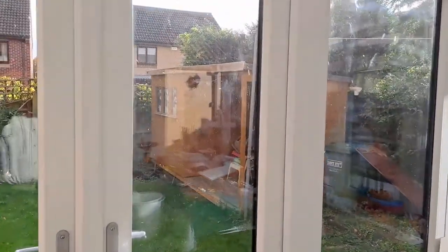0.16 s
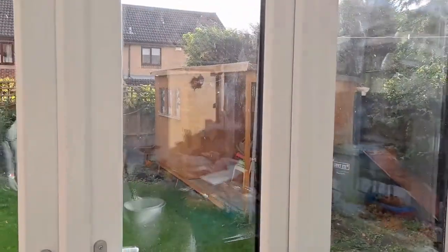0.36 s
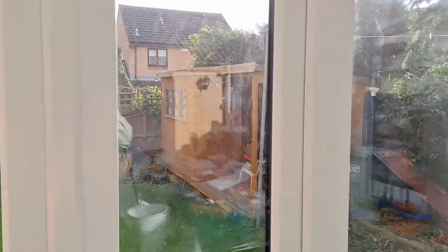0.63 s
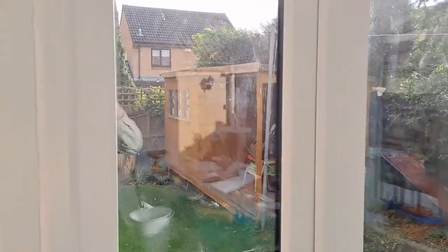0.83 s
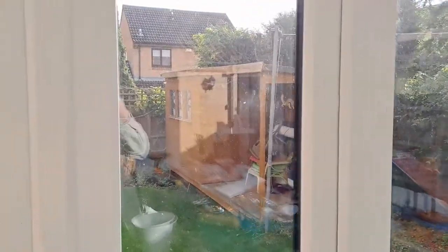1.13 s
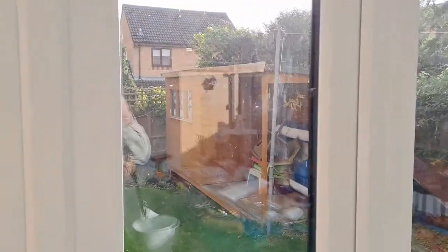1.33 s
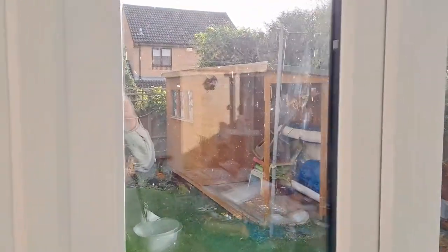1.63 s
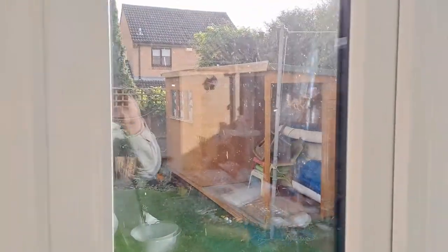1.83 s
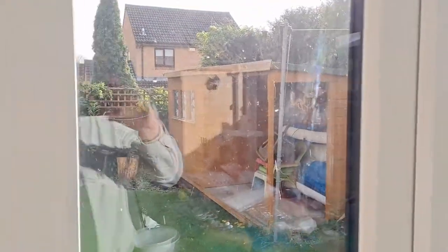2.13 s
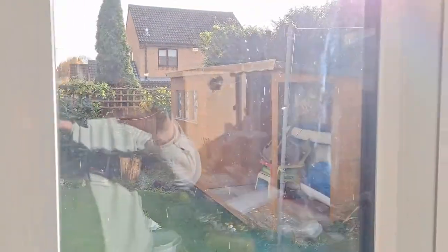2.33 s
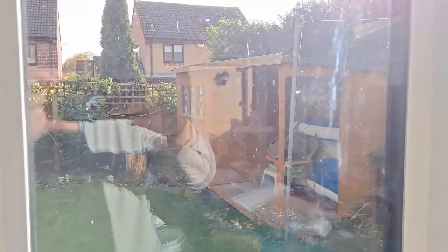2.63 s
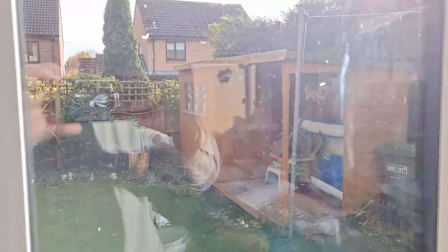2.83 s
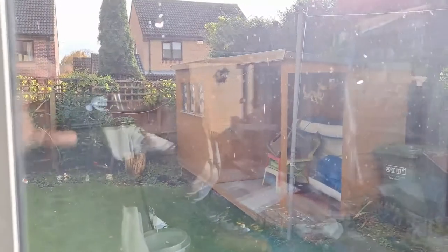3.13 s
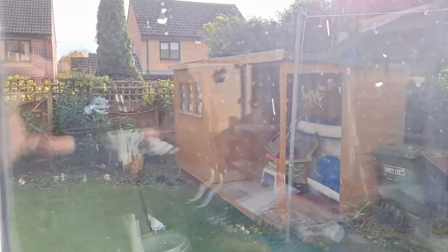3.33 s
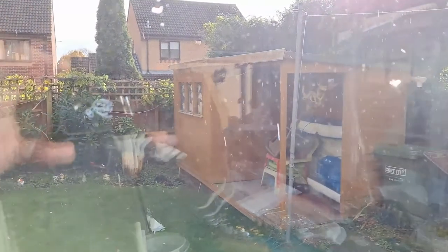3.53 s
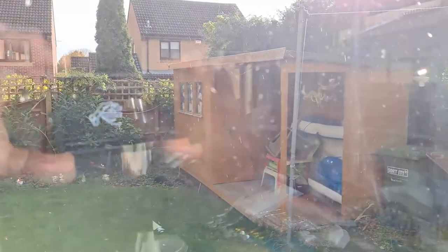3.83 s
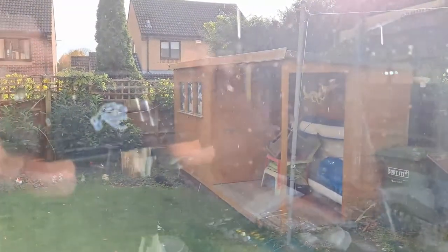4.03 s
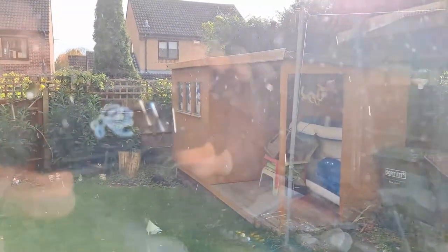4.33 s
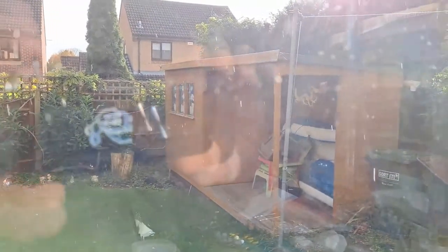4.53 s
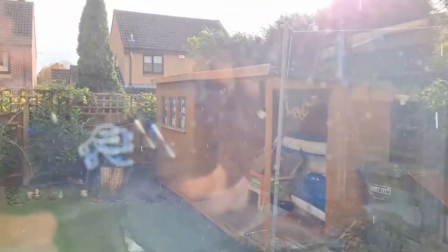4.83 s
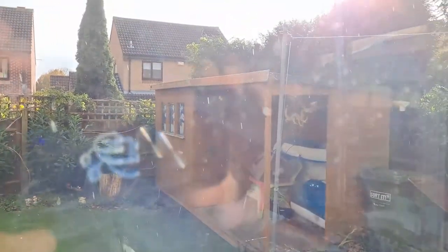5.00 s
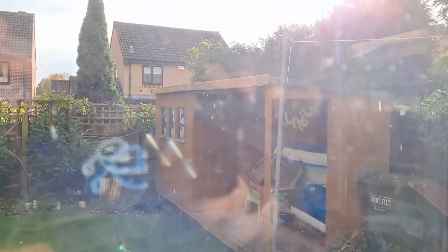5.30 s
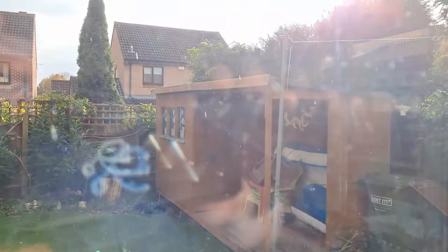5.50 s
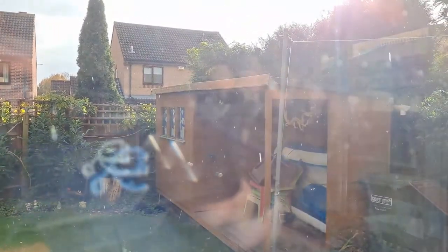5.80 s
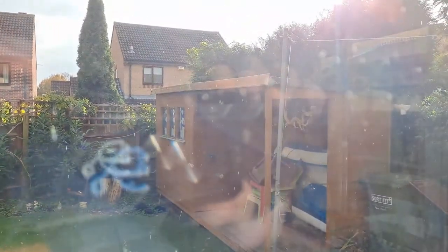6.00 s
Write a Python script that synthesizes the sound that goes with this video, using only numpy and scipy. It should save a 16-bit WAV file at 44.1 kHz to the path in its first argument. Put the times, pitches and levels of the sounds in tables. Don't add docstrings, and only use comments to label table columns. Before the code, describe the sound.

Steady rain patters on glass panes heard from inside a glazed room, with distinct plinking drops and one dull, rattling knock past the middle.

```python
import sys
import numpy as np
from scipy import signal
from scipy.fft import rfft, irfft
from scipy.io import wavfile
from scipy.ndimage import uniform_filter1d

SR = 44100
rng = np.random.default_rng(int(sys.argv[2]) if len(sys.argv) > 2 else 0)


def volts_from_db(level):
    exponent = np.asarray(level, float) / 20
    return 10 ** exponent


def persist_wave(psi):
    counts = np.round(np.clip(psi, -1, 1) * 32767).astype(np.int16)
    wavfile.write(sys.argv[1], SR, np.atleast_2d(counts).T)


N = 271656

# [t/s, level/dB]
RAIN_STRENGTH = [(0, -50), (.4, -50.5), (.85, -48), (1.15, -52), (1.4, -47.5), (1.9, -49), (2.4, -49),
                 (3.2, -50), (3.8, -50.5), (4.3, -49), (4.7, -51.5), (5.15, -50), (5.35, -49.5), (5.7, -51),
                 (6.16, -53)]
# [t/s, level over the slow strength/dB]
FLURRIES = [(.26, 1.5), (.34, 0), (.52, 4.5), (1.06, -2), (1.13, 4), (1.78, -1.5), (1.98, 2), (2.06, -0.5),
            (2.37, 1.5), (3.48, 5), (3.55, -0.5), (3.61, 3.5), (3.68, -1.5), (3.94, -3), (4.21, -4),
            (4.32, 0.5), (4.46, 3), (4.7, 1.5), (5.15, -2), (5.25, 1.5)]
# [f/Hz, level per Hz/dB]
PANE_SPECTRUM = [(150, -38), (250, -13), (330, -19), (695, -8), (886, -10), (1130, -8), (1210, -7.5),
                 (2300, 0.5), (2830, -0.5), (3310, 0), (4550, -18), (7740, -14), (10600, -27.5),
                 (14000, -25), (15800, -27)]
# [f/Hz, level per Hz/dB]
RUMBLE_SPECTRUM = [(25, 1), (42, 1.5), (60, 5), (78, -8.5), (100, 1.5), (124, -2.5), (146, -3.5), (250, -8),
                   (500, -10), (700, -50)]
# [f/Hz, correlation/1]
COHERENCE = [(60, 0.71), (180, 0.94), (550, 0.83), (1650, -0.13), (4970, 0.0049), (15000, -0.089)]
# [f/Hz, left minus right/dB]
BALANCE = [(60, 2), (180, -10), (550, 2), (1650, 1), (4970, 3.5), (15000, -0.5)]
# [t/s, peak level/dB, ring f/Hz, left minus right/dB]
BIG_DROPS = [(0.0184, -43, 2150, 0), (0.4354, -37, 2330, 3.0), (0.484, -38.5, 1940, -3),
             (0.634, -40, 2740, -3), (0.7846, -39, 3180, 2.5), (1.1288, -34.5, 2300, 5),
             (1.2461, -36, 2270, 1.5), (1.3507, -32.5, 2320, 1.5), (1.9559, -36, 2690, 4),
             (2.3446, -34, 3230, 3.0), (2.4778, -41, 1930, -4), (2.619, -37, 3020, 2.5),
             (3.075, -33, 3340, 1.5), (3.189, -38, 2960, 2.0), (3.361, -36, 3300, 4),
             (3.469, -43, 2920, 2.0), (3.7444, -38, 2190, 0.0), (3.8082, -37, 2750, 1.0),
             (4.0302, -37, 2110, -0.5), (4.0886, -41, 2250, -2), (4.2712, -46, 2770, 31),
             (4.5072, -36, 2800, 3), (4.6922, -35, 2500, 7), (4.8483, -39, 2400, 1.0),
             (4.898, -32.5, 2800, 8), (5.0153, -36, 2870, 3.0), (5.1741, -39, 2400, 5),
             (5.253, -36, 2620, 8), (5.328, -34.5, 2330, 2.0), (5.7575, -36, 2780, 0)]
# [t/s, peak level/dB, ring f/Hz, left minus right/dB]
FRAME_DROPS = [(1.44, -38, 1000, 4.5), (1.464, -53, 1110, -1), (1.555, -42.5, 763, 0),
               (1.778, -44.5, 646, 4), (1.883, -40, 985, 4.5), (1.909, -38, 640, 0),
               (1.946, -35.5, 660, -3), (2.068, -44, 597, -2), (2.475, -45, 1030, -5),
               (3.437, -37, 830, -5), (4.029, -27.5, 790, 8), (4.05, -21.5, 494, 3), (4.09, -29.5, 467, 16),
               (4.365, -46, 380, 7), (5.621, -39.5, 734, 5.5)]
# [t/s, peak level/dB, ring f/Hz, left minus right/dB]
TICKS = [(1.248, -45, 7810, 2.5), (1.476, -50, 4000, -6), (2.3494, -44, 4100, 4), (2.6294, -36, 4550, 2.5),
         (2.8948, -56, 6210, -2), (3.3694, -41, 4000, 3), (3.443, -39, 5890, 11), (3.9679, -40, 6710, 6),
         (4.0311, -28, 4470, 0.5), (4.091, -24, 5000, 1), (4.242, -41, 5440, 5), (4.3699, -36, 6080, -11),
         (4.4238, -37, 5960, -4), (4.4664, -44, 6830, 5), (4.5071, -36, 6850, 4), (4.792, -36, 7470, 9),
         (4.8419, -39, 7150, 11), (4.8993, -52, 5640, 3.0), (4.9564, -47, 6660, 2.5),
         (4.9681, -47, 7470, -3), (5.362, -48, 5700, 2), (5.5214, -49, 5450, -11), (5.6422, -35, 4100, 1.5),
         (5.665, -30, 8040, -1), (5.9544, -37, 7700, -1), (5.9883, -36, 7300, 1.5), (6.0252, -53, 6910, -1)]
# [t/s, level/dB, lowest f/Hz, highest
# f/Hz, duration/s]
SPRAYS = [(1.246, -52.5, 3900, 19000, 0.052), (1.3, -64, 4300, 7000, 0.13), (1.5, -63, 4300, 7000, .12),
          (2.343, -61, 3800, 5800, .025), (2.615, -55.5, 3800, 6500, 0.038), (3.35, -64, 4000, 7000, .02),
          (3.444, -51, 3700, 15000, .0036), (3.452, -53, 500, 8600, .035), (3.5, -58, 900, 6800, .024),
          (4.029, -45.5, 700, 17000, 0.036), (4.049, -54.5, 3800, 7500, 0.14),
          (4.055, -43.5, 200, 820, 0.069), (4.089, -31, 970, 2410, 0.0048),
          (4.091, -42.5, 3540, 7040, 0.0076), (4.15, -53, 1500, 5900, 0.029), (4.2, -56.5, 109, 300, 0.076),
          (4.96, -56.5, 6600, 8300, 0.043), (1.9, -65, 450, 860, 0.068), (4.999, -64, 200, 900, 0.15),
          (5.22, -63.5, 200, 900, 0.15), (5.45, -64.5, 200, 900, 0.18)]
# [t/s, level/dB, lowest f/Hz, highest f/Hz, duration/s]
SIDE_SPRAYS = [
    (4.536, -54.5, 4350, 6600, 0.037),
    (4.54, -62.5, 5900, 10000, 0.037),
]
# [t/s, peak level/dB, f/Hz, cycles to 60 dB decay/1]
KNOCK_MODES = [(4.027, -34, 487, 17), (4.029, -37, 788, 83), (4.0497, -20, 238, 6), (4.052, -32, 64, 12),
               (4.0545, -25, 125, 3.2), (4.06, -39, 95, 8), (4.0748, -29.5, 151, 13),
               (4.081, -31.5, 139, 9), (4.09, -35, 348, 22), (4.094, -30.5, 91.5, 11.6),
               (4.1, -43, 776, 49), (4.1057, -31, 175, 19), (4.147, -40, 107, 13), (4.165, -43, 260, 25)]
# [f/Hz, t60/s]
ROOM_DECAY = [(100, 0.41), (500, 0.26), (2000, 0.29), (8000, 0.072)]
# [t/s, nearness 0-1/1]
NEAR_GLASS = [(0, 0.06), (2.5, 0.32), (4.1, .45), (4.5, 0.7), (6.16, 1)]
# [t/s, level/dB]
STEPS = [
    (.97, 4),
    (1.97, 4),
    (2.75, 5),
    (3.65, 0.5),
    (4.42, 0),
    (4.58, 2),
    (4.8, -1),
    (5.01, 3.5),
    (5.28, 4.5),
    (6.1, 1.5),
]

FLURRY_S, STEP_S = 0.042, 0.045
USUAL_DB = -49.5
TREBLE_LAG, BODY_LAG, RUMBLE_FOLLOW = 0.43, 0.054, 0.44
BRIGHT_DB, BODY_DB, HOUSE_DB = 0.08, -0.77, -69.5
HOUSE_NEAR_DB, TOP_FADE_DB = 8.5, -0.5
SHAKE_S, SHAKE_RISE_S, SHAKE_FALL_S = 4.03, 0.088, 0.054
SHAKE_PANES_DB, SHAKE_BODY_DB, SHAKE_HOUSE_DB = 5.5, 4, 19
SPRAY_LEAN_DB, SIDE_LEAN_DB = 1.5, 11
RISE_SHARE = 0.033
GATE_DB, GATE_HZ = 1.1, 11000


def evened(x):
    return x / np.sqrt(np.mean(x ** 2) + 1e-20)


def read(points, hz):
    f, value = np.transpose(points)
    return np.interp(np.log(hz + 1), np.log(f + 1), value)


def bumps(rows, half_s, t):
    return sum(db * np.exp(-((t - s) / half_s) ** 2) for s, db in rows)


def strength(t):
    return np.interp(t, *np.transpose(RAIN_STRENGTH)) + bumps(FLURRIES, FLURRY_S, t) - USUAL_DB


def shake(t):
    late = t - SHAKE_S - SHAKE_RISE_S
    rise = np.clip(1 + late / SHAKE_RISE_S, 0, 1)
    return rise * np.exp(-(np.maximum(late, 0) / SHAKE_FALL_S) ** 2)


def nearness(t):
    return np.interp(t, *np.transpose(NEAR_GLASS))


def add(mix, s, sound, pan_db):
    part = mix[:, round(s * SR):][:, :sound.shape[-1]]
    part += sound[..., :part.shape[1]] * volts_from_db(np.array([[pan_db / 2], [-pan_db / 2]]))


def ring(hz, cycles, rise, size=1500):
    turns = hz * np.arange(size) / SR
    return np.sin(2 * np.pi * turns) * volts_from_db(-60 * turns / cycles) * (1 - np.exp(-(turns / rise) ** 2))


def noise(db, patchy_db):
    a, b, c, d, patches = rng.standard_normal((db.shape[1], 513, 5)).T
    hz = np.fft.rfftfreq(1024, 1 / SR)
    patches = uniform_filter1d(patches, size=12, axis=0)
    patches = evened(uniform_filter1d(patches, size=10, axis=1))
    same = np.clip(read(COHERENCE, hz), -1, 1)[:, None]
    left, other = a + 1j * b, c + 1j * d
    z = np.array([left, same * left + np.sqrt(1 - same ** 2) * other])
    return signal.istft(z * volts_from_db(db + patchy_db * patches), nperseg=1024, noverlap=768)[1][:, :N]


def rumble():
    flat = noise(np.zeros((513, N // 256 + 5)), patchy_db=0.6)
    t, hz = np.arange(N) / SR, np.fft.rfftfreq(N, 1 / SR)
    low = evened(irfft(rfft(flat) * volts_from_db(read(RUMBLE_SPECTRUM, hz)), N))
    level_db = HOUSE_DB + RUMBLE_FOLLOW * strength(t) + bumps(STEPS, STEP_S, t)
    level_db = level_db + HOUSE_NEAR_DB * nearness(t) + SHAKE_HOUSE_DB * shake(t)
    return low * volts_from_db(level_db + np.array([[1.5], [-.1]]))


def room(x):
    taps = np.zeros((2, SR // 2))
    at = np.arange(160, SR // 2 - 20, 20) + rng.integers(0, 20, (2, (SR // 2 - 161) // 20))
    np.put_along_axis(taps, at, rng.choice([-1., 1.], at.shape), 1)
    hz, t, z = signal.stft(taps, SR, nperseg=256)
    same = np.clip(read(COHERENCE, hz) - .05, 0, .95)[:, None]
    z = np.array([z[0], same * z[0] + np.sqrt(1 - same ** 2) * z[1]])
    decay_db = -60 * t / read(ROOM_DECAY, hz)[:, None]
    tail = signal.istft(z * volts_from_db(decay_db), SR, nperseg=256)[1]
    return signal.fftconvolve(x, tail / np.linalg.norm(tail[0]), axes=1)[:, :N]


def knock():
    out = np.zeros((2, N))
    for s, db, hz, cycles in KNOCK_MODES:
        mode = ring(hz, cycles, RISE_SHARE * cycles, size=SR // 3)
        add(out, s, volts_from_db(db) * mode[None], 1.2)
    return out


def sprays():
    out, t = np.zeros((2, N)), np.arange(SR // 4) / SR
    rows = [(*row, SPRAY_LEAN_DB) for row in SPRAYS] + [(*row, SIDE_LEAN_DB) for row in SIDE_SPRAYS]
    for s, db, low_hz, high_hz, lasting, pan_db in rows:
        band = signal.butter(2, [low_hz, min(high_hz, 20000)], "bandpass", fs=SR, output="sos")
        hiss = evened(signal.sosfilt(band, rng.standard_normal((2, len(t)))))
        body = np.exp(-(t / lasting) ** 2) + .3 * np.exp(-t / .003)
        onset = 1 - np.exp(-t / .0006)
        add(out, s, volts_from_db(db) * hiss * body * onset, pan_db)
    return out


def single_drops():
    out = np.zeros((2, N))
    kinds = ((BIG_DROPS, 18, 1.8, 9), (FRAME_DROPS, 9, .9, 1.5), (TICKS, 22, 2.5, 1.5))
    for rows, cycles, rise, gain_db in kinds:
        lags = rng.integers(-6, 7, len(rows))
        for (s, db, hz, pan_db), lag in zip(rows, lags):
            tap = np.pad(ring(hz, cycles, rise), (8, 0))
            add(out, s, volts_from_db(db + gain_db) * np.array([tap, np.roll(tap, lag)]), pan_db)
    return out


def patter(per_s, spread_db, cycles, click, echo_share, echo_s):
    out, t = np.zeros((2, N)), np.arange(2500) / SR
    size = volts_from_db(spread_db * np.minimum(rng.exponential(1, N), 4))
    size *= rng.random(N) < per_s / SR
    patch = rng.integers(0, 36, N)
    for k, hz in enumerate(np.geomspace(300, 16000, num=36)):
        tail = rng.standard_normal((2, len(t))) * volts_from_db(-60 * t / max(echo_s, .005))
        tail *= echo_share / np.linalg.norm(tail[0])
        tail[[0, 1], rng.integers(0, 20, 2)] += 1
        tap = ring(hz, cycles, 0.92)
        tap[0] += click * np.linalg.norm(tap)
        tap = signal.fftconvolve(tail, tap[None]) * np.sqrt(hz) / np.linalg.norm(tap)
        out += signal.oaconvolve((size * (patch == k))[None], tap, axes=1)[:, :N]
    z = rfft(out)
    power = uniform_filter1d(abs(z) ** 2, size=700, axis=1)
    return evened(irfft(z / np.sqrt(power + 1e-9), N))


def rain():
    far = evened(noise(np.zeros((513, N // 256 + 5)), patchy_db=1.5))
    near = patter(per_s=4000, spread_db=3.5, cycles=23, click=0.47, echo_share=2.08, echo_s=0.11)
    hz, t, z = signal.stft(far + volts_from_db(-1.0) * near, SR, nperseg=256)
    treble, mids = np.clip((hz - 3800) / 2500, 0, 1), np.clip((1500 - hz) / 600, 0, 1)
    treble_db = BRIGHT_DB - TREBLE_LAG * strength(t) - 0.19 * SHAKE_PANES_DB * shake(t)
    mids_db = BODY_DB - BODY_LAG * strength(t) + SHAKE_BODY_DB * shake(t)
    z = z * volts_from_db(np.outer(treble, treble_db) + np.outer(mids, mids_db))
    gusts = evened(uniform_filter1d(rng.standard_normal(len(t)), size=24))
    top_db = 1.4 * gusts + TOP_FADE_DB * nearness(t)
    z = z * volts_from_db(np.outer(np.clip((hz - 8500) / 2500, 0, 1), top_db))
    bunches = evened(uniform_filter1d(rng.standard_normal(len(t)), size=5))
    drops = signal.istft(z * volts_from_db(0.74 * bunches), SR, nperseg=256)[1][:, :N]
    hz = np.fft.rfftfreq(N, 1 / SR)
    lean = read(BALANCE, hz) / 2
    drops = irfft(rfft(drops) * volts_from_db(read(PANE_SPECTRUM, hz) + np.array([lean, -lean])), N)
    t = np.arange(N) / SR
    return evened(drops) * volts_from_db(USUAL_DB + strength(t) + SHAKE_PANES_DB * shake(t) + 3.5)


def scene():
    taps, boom = single_drops() + sprays(), knock()
    return rain() + rumble() + taps + boom + volts_from_db(-5.0) * room(taps) + volts_from_db(-11.5) * room(boom)


def gate(x):
    sum_difference = np.array([x[0] + x[1], x[0] - x[1]]) / 2
    hz, t, z = signal.stft(sum_difference, SR, nperseg=2048, noverlap=1536)
    level_db = 10 * np.log10(uniform_filter1d(abs(z) ** 2, size=2, axis=1) + 1e-20)
    usual_db = uniform_filter1d(np.median(level_db, axis=2), size=40, axis=1)[..., None]
    frame_db = np.median((level_db - usual_db)[:, hz > GATE_HZ], axis=1)[:, None]
    budget_db = .9 * np.minimum(frame_db, 2) + .3 * rng.standard_normal(len(t))
    above = hz[:, None] - GATE_HZ
    ragged_db = np.clip(above / 1200, 0, 4) * rng.standard_normal(len(t))
    valley_db = -5 - abs(hz[:, None] - 4900) / 250
    slope_db = np.maximum(np.clip(above / 250, -60, 0), valley_db) + ragged_db
    kept = level_db > usual_db + GATE_DB + budget_db + slope_db
    mid, side = signal.istft(z * kept, SR, nperseg=2048, noverlap=1536)[1]
    return np.array([mid + side, mid - side])[:, :N]


def band_limit(x):
    return signal.sosfilt(signal.butter(12, 15880, fs=SR, output="sos"), x)


def record(dry):
    cut = signal.butter(5, 50, "highpass", fs=SR, output="sos")
    mix = gate(signal.sosfilt(cut, dry))
    return band_limit(mix)


dry = scene()
out = record(dry)
persist_wave(out)
```